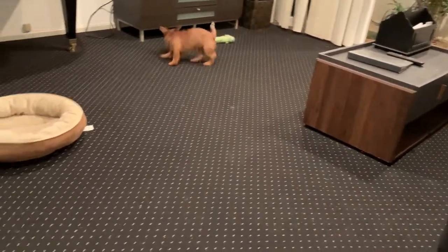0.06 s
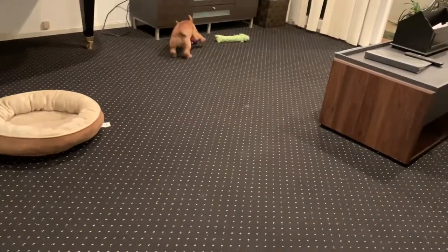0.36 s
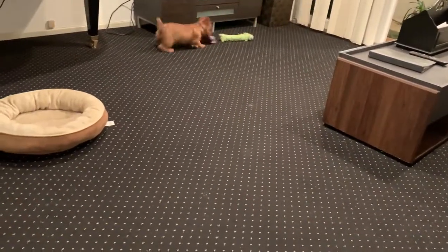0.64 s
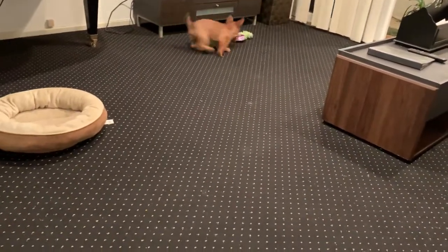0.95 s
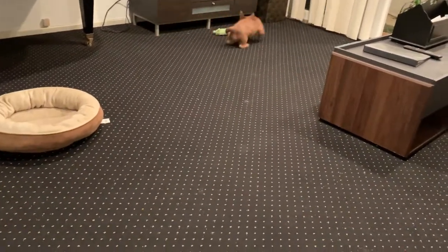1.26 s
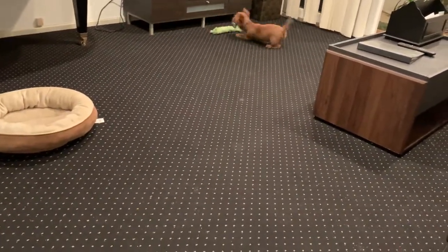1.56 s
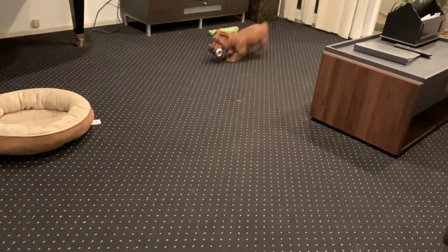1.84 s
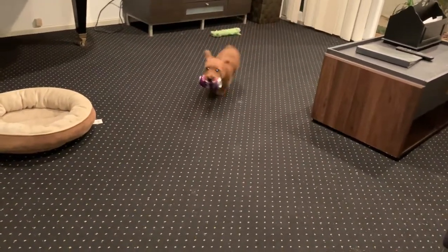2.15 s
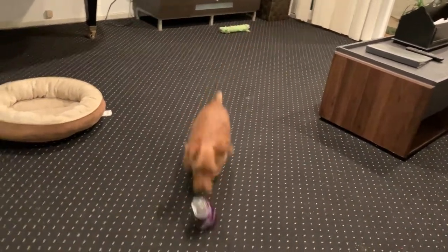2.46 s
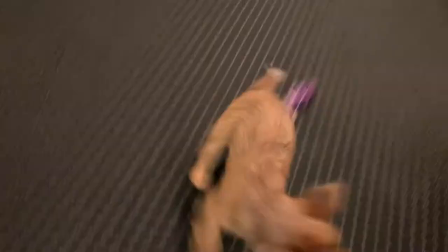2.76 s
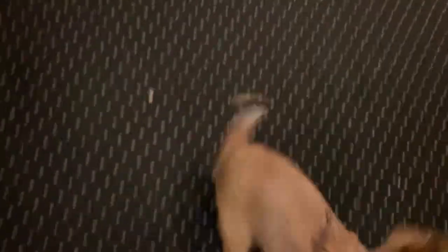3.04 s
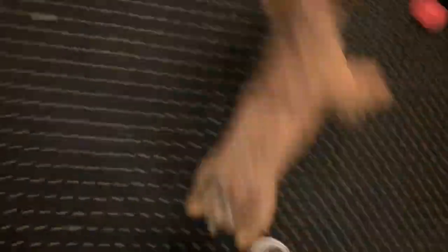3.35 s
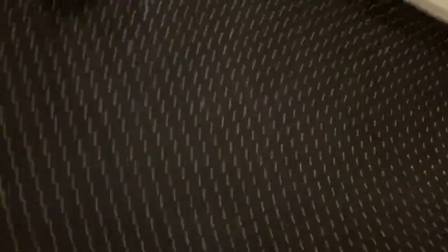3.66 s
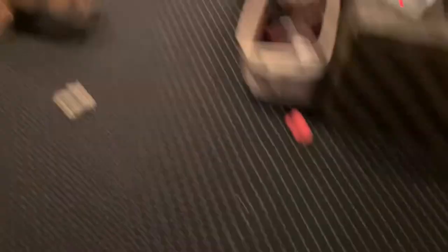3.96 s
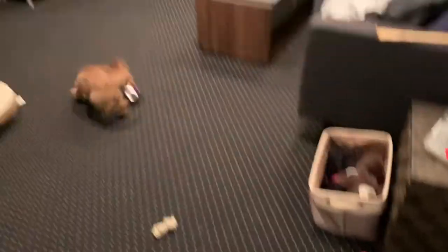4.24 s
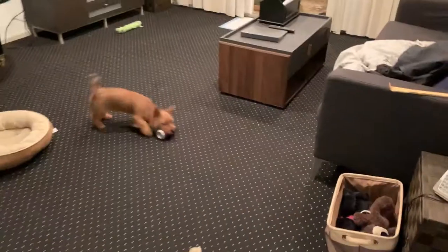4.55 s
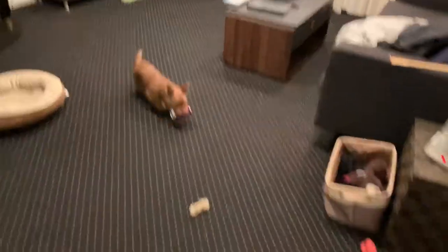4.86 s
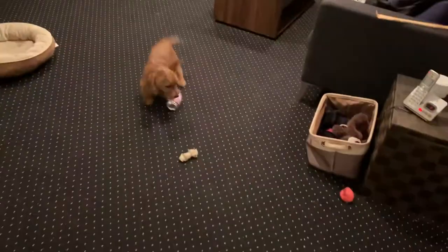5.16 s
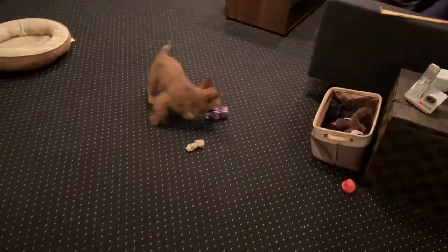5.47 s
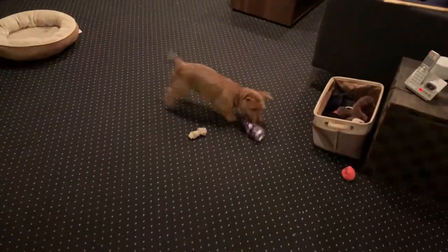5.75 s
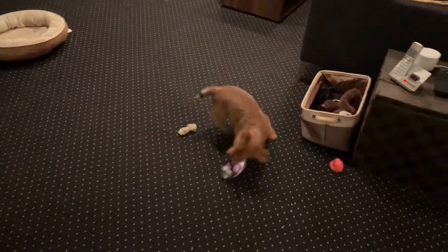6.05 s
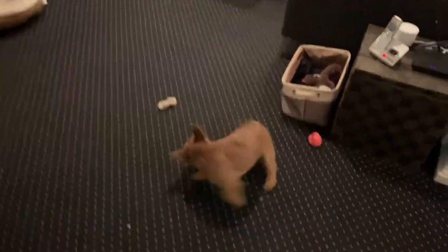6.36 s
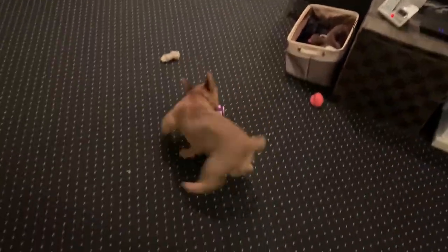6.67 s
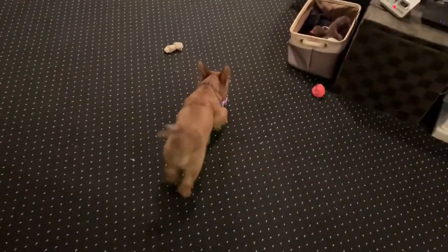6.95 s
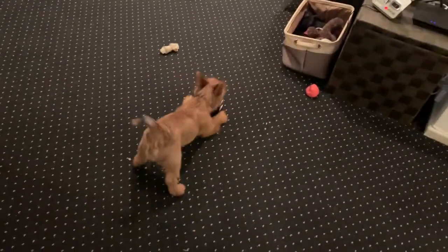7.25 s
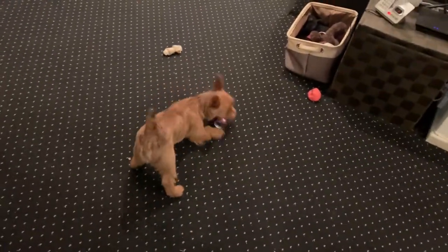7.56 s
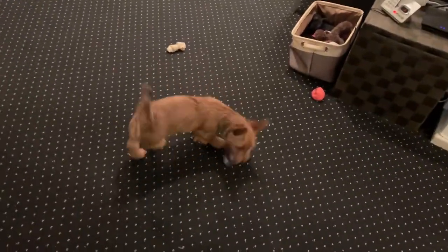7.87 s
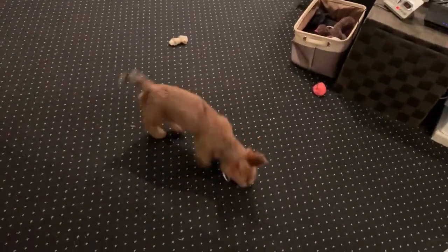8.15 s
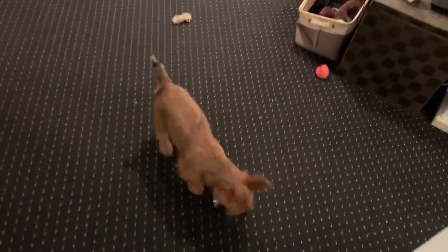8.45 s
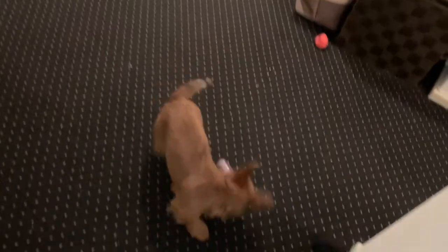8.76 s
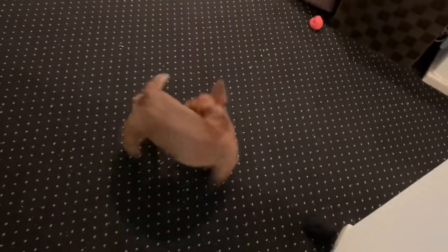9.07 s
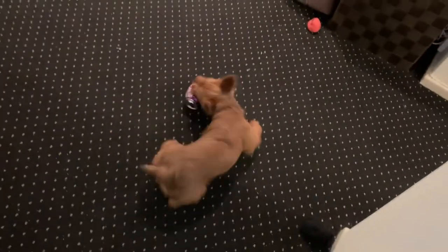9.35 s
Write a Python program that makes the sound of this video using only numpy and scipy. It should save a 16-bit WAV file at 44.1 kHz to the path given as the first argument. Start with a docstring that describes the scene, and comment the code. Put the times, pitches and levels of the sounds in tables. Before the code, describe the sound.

A puppy mouths and shoves an empty aluminium can across carpet, making irregular cracks, hollow clanks and crinkles over soft paw thuds.

```python
"""An empty aluminium can, mouthed, dropped and shoved about a carpeted living room by a puppy.
The dented wall buckles in sharp cracks and hollow clanks, crinkles and scrapes under teeth and paws,
and the air inside hums; let go, the shell rings. Paws thud and fur rustles on the carpet, and the room
answers briefly. Heard now near, now farther off, through a hand-held pair of microphone ports,
with some handling rumble over quiet room tone."""
import sys
import numpy as np
from scipy import signal
from scipy.fft import rfft, irfft, next_fast_len
from scipy.io import wavfile
from scipy.ndimage import uniform_filter1d, map_coordinates

SR = 44100
rng = np.random.default_rng(int(sys.argv[2]) if len(sys.argv) > 2 else 0)


def pcm_store(signal):
    """Save signal as 16-bit PCM."""
    levels = np.round(np.clip(np.atleast_2d(signal), -1, 1) * 32767)
    wavfile.write(sys.argv[1], SR, levels.astype(np.int16).T)


N = 414981

# room tone: freq_hz, density_db
AIR_SPECTRUM = [(20, -41.5), (30, -22.5), (48, -11.5), (90, 5), (180, -6), (300, 2.5), (500, -3),
                (1000, -13), (2000, -42.5), (5000, -35.5), (10000, -40.5), (16000, -43)]
# low hum, growing as the microphone moves through the room: time_s, level_db
HUM_LEVEL = [(2.5, -59), (4.8, -52), (9.4, -52)]
# movement at and near the microphone, driving rumble and rustle: time_s, level_db
MOVEMENT_LEVEL = [(0.0, -54), (2.65, -62), (2.77, -44), (3.25, -51), (3.45, -45), (3.9, -48), (4.2, -48),
                  (6.47, -57.5), (6.73, -57), (6.94, -54), (9.3, -51.5)]
# rumble of the hand: freq_hz, density_db
RUMBLE_SPECTRUM = [(18, -29.5), (30, -10.5), (45, -1), (60, -2.5), (100, -7), (200, -8), (600, -58)]
# soft rustle, loudest as fur and paws brush the carpet near the microphone: freq_hz, density_db
RUSTLE_SPECTRUM = [(150, 2.5), (400, -1), (1500, 1), (3500, -9), (5200, -5.5), (8000, -12.5), (16000, -26)]
# light paw steps on the carpet, coming and going, faint after about five seconds: time_s, level_db
PATTER_LEVEL = [(0, -25), (1.5, -42), (1.8, -25), (2.3, -31.5), (2.7, -33.5), (3.4, -38), (4.4, -27.5),
                (4.8, -45), (9.4, -47)]
# heavy footfalls and bumps of the can on the carpet: start_s, level_db, pitch_hz
CARPET_THUDS = [(.58, -17.5, 300), (2.767, -23, 426), (2.815, -23, 313), (2.841, -20, 271),
                (3.011, -23, 360), (3.034, -25, 122), (3.063, -20, 294), (3.129, -24.5, 396),
                (3.173, -25.5, 268), (3.37, -28.5, 214), (3.403, -25.5, 247), (3.508, -21, 215),
                (3.562, -23, 284), (3.656, -25, 400), (3.748, -21.5, 474), (3.764, -17.5, 260),
                (3.85, -13, 355), (4.289, -20.5, 288), (5.237, -22, 170), (8.009, -16.5, 414),
                (8.545, -13.5, 384), (8.664, -17, 490), (8.674, -20.5, 270), (8.942, -13.5, 293),
                (9.191, -20.5, 155), (9.245, -12.5, 290), (9.353, -20.5, 261)]
# loud buckles and knocks of the can: start_s, hollow_db, clank_db, crack_db, dent_hz, crush_s
BUCKLES = [(0.126, -29.5, -22.5, -27.5, 1140, 0.0038), (0.137, -19, -19, -21, 1104, 0.025),
           (.178, -18.5, -18.5, -20.5, 687, 0.0093), (.236, -40, -20.5, -27.5, 2120, .003),
           (0.254, -57, -22.5, -19.5, 1900, 0.031), (.321, -51, -24.5, -22, 1650, 0.0047),
           (0.446, -38, -23.5, -22, 1830, 0.011), (.51, -51.5, -22.5, -24, 1031, 0.014),
           (0.536, -28, -31, -20, 1145, .016), (1.024, -26.5, -22.5, -19.5, 828, .004),
           (1.031, -25, -25.5, -21, 1233, 0.011), (1.1, -21, -14.5, -17, 628, 0.005),
           (1.107, -22, -20, -19.5, 620, 0.011), (1.173, -50.5, -25.5, -30.5, 1147, 0.006),
           (1.181, -47.5, -19.5, -17.5, 1106, 0.007), (1.52, -62, -36.5, -34, 1605, 0.0059),
           (2.14, -21.5, -18, -11, 1630, 0.0079), (2.207, -20.5, -21.5, -28.5, 1184, 0.021),
           (2.319, -17.5, -6.5, -7.5, 1584, 0.0079), (2.549, -28, -10.5, -20.5, 918, 0.008),
           (2.561, -19, -8, -9.5, 943, 0.0062), (3.571, -24, -28, -30, 1090, 0.07),
           (3.636, -26, -25, -46, 1175, 0.043), (3.833, -14.5, -16.5, -13.5, 1500, 0.005),
           (3.849, -11, -8, -14, 1342, 0.019), (4.461, -26.5, -25.5, -27, 3010, 0.012),
           (4.561, -30, -17.5, -16, 1507, 0.0056), (4.786, -53, -28.5, -57, 1260, .002),
           (4.947, -17, -16.5, -21.5, 1350, 0.0028), (5.171, -32.5, -35, -44.5, 1514, 0.0034),
           (5.47, -27.5, -34.5, -34, 1194, 0.016), (5.596, -18.5, -12, -10, 1420, 0.0045),
           (5.655, -16, -20.5, -37, 1470, 0.023), (5.879, -25, -27.5, -30, 2450, 0.0061),
           (5.8978, -21.5, -13, -11.5, 1304, 0.0062), (5.936, -33, -24, -45, 1396, 0.0061),
           (6.157, -29.5, -28, -23, 3410, 0.0075), (6.165, -24, -22, -22, 930, 0.011),
           (6.198, -10, -12, -12, 950, 0.016), (6.27, -43, -20.5, -62, 990, .003),
           (6.336, -31, -21.5, -33.5, 905, 0.01), (6.364, -30.5, -17.5, -47, 990, 0.0088),
           (6.376, -35.5, -15.5, -42.5, 1017, 0.0033), (6.435, -23, -10.5, -13.5, 1590, 0.012),
           (6.518, -35, -22, -36.5, 990, 0.0031), (6.533, -39, -14, -19.5, 2450, 0.032),
           (6.581, -16, -14, -7.5, 2876, 0.011), (6.596, -19, -13.5, -10, 970, 0.01),
           (6.621, -28.5, -15, -9.5, 2765, 0.0084), (6.636, -16, -13, -12, 537, 0.0064),
           (6.731, -54, -44, -28, 2920, 0.0024), (6.756, -60, -17.5, -14, 1750, 0.0045),
           (6.831, -68, -31, -33.5, 1920, 0.0024), (6.893, -45, -29.5, -15.5, 3030, 0.0026),
           (6.937, -21, -18, -6.5, 2980, 0.0063), (6.991, -31, -19.5, -22, 1005, 0.0061),
           (7.003, -56, -33.5, -19.5, 3170, 0.0023), (7.052, -49, -29.5, -24, 2910, 0.0084),
           (7.076, -26.5, -14, -26.5, 1058, 0.012), (7.097, -33, -24, -21, 1050, 0.0013),
           (7.313, -32, -12, -9.5, 1415, 0.0048), (7.371, -61, -28, -30, 3570, 0.0084),
           (7.395, -41, -22.5, -30, 2260, 0.0075), (7.507, -37, -20, -38.5, 1437, 0.019),
           (7.538, -14, -10.5, -9, 1072, 0.0083), (7.665, -22, -22, -25.5, 1043, 0.023),
           (7.702, -27.5, -26, -49, 1110, 0.014), (7.853, -30, -25.5, -72, 1620, 0.0095),
           (7.964, -29, -24, -33, 1295, 0.028), (8.009, -29, -15.5, -25.5, 1483, 0.024),
           (8.106, -54, -29.5, -53, 1680, 0.0019), (8.141, -27.5, -11.5, -11, 1720, 0.0069),
           (8.167, -36, -11, -11, 1740, 0.0057), (8.203, -48, -31, -28.5, 1740, 0.0047),
           (8.365, -30.5, -38, -37.5, 1090, 0.0032), (8.526, -24, -30.5, -47.5, 604, .004),
           (8.555, -22, -18, -24, 1975, 0.0093), (8.799, -36.5, -26.5, -59, 1966, 0.02),
           (8.952, -19.5, -11.5, -14.5, 1586, 0.0076), (9.004, -25.5, -13.5, -33, 746, 0.0017),
           (9.046, -54, -24, -39, 2160, 0.0025), (9.344, -32.5, -24.5, -42, 646, 0.015),
           (9.402, -31, -13, -27.5, 1680, 0.011)]
# hollow colour of a blow, from the whole body: freq_hz, density_db
HOLLOW_SPECTRUM = [(70, -33.5), (170, -12), (260, 3.5), (420, -2), (620, -2.5), (800, -1.5), (1200, -39.5),
                   (3000, -68)]
# midrange clank of the wall: freq_hz, density_db
CLANK_SPECTRUM = [(250, -32), (560, -61.5), (800, 2.5), (1100, 5), (1700, 4), (2200, -5), (3200, -5),
                  (8000, -32.5)]
# bright crack of the crease: freq_hz, density_db
CRACK_SPECTRUM = [(800, -108), (1800, -2), (2600, -3), (4200, -1), (5500, -0.5), (7500, -2), (10500, -4.5),
                  (13000, -8.5), (15600, -10.5), (16500, -14)]
# ringing modes of the shell: pitch_hz, level_db, t60_s
SHELL_MODES = [(574, -5.5, 0.3), (749, -1.5, 0.12), (913, -10.5, 0.51), (1030, -0.5, 0.21),
               (1145, -15.5, 0.39), (1460, -9, 0.048), (1650, -11, 0.058), (2200, -27, .15),
               (2750, -24.5, 0.18), (2850, -30, 0.17), (3230, -16.5, .18), (4500, -28, .12),
               (4730, -24.5, 0.13), (6850, -9.5, .12), (7460, -31.5, .12)]
# how freely the air in the can hums through its opening: time_s, gain_db
CAVITY_GAIN = [(0, -69), (2.2, -23.5), (3.8, -42), (5, -39), (7.55, -26), (7.7, -14.5)]
# wall resonances, crowding and evening out in the top treble: freq_hz, unevenness_factor
WALL_UNEVENNESS = [(300, 0.29), (1200, 5.2), (3500, 3.2), (7000, 6.9), (15000, 0.61)]
# room against direct sound, higher with the puppy farther from the microphone: time_s, wet_db
DISTANCE_WET = [(1.5, 4), (2.5, -3.5), (4.5, 1.5), (6, -4), (9.4, -3.5)]
# how hard teeth and paws work the can between buckles: time_s, level_db
CHEW_EFFORT = [(0, -72), (.11, -52), (.17, -38), (.55, -44.5), (.7, -53.5), (.98, -74), (1.08, -35),
               (1.2, -34.5), (1.35, -56), (5.2, -82.5), (6.1, -73), (6.2, -32), (6.6, -31.5), (6.8, -35.5),
               (7.08, -31), (7.2, -66), (8, -41), (8.7, -85), (9.05, -42), (9.2, -50)]
# shoves of the can over teeth and carpet: peak_s, level_db, half_width_s (at half height)
SHOVES = [(0.273, -33, .028), (0.555, -26.5, 0.037), (2.852, -40.5, 0.013), (3.119, -47.5, 0.011),
          (4.478, -36.5, 0.036), (5.587, -28.5, 0.012), (6.543, -21, 0.013), (8.333, -34, 0.017),
          (8.933, -30.5, 0.012), (9.072, -38, 0.027)]
# the can falls free of the jaws: start_s, level_db, favoured_hz, damping_factor
CAN_FALLS = [(.575, -26, 850, 1.4), (.635, -33, 517, .5), (1.102, -17, 600, 1.7), (2.14, -22, 735, .7),
             (2.321, -13, 590, 1.6), (2.563, -7, 587, 1.15), (3.853, -17, 600, 1.8), (4.95, -13, 750, .65),
             (9.005, -19, 1030, 1.7)]
# claws and can, close to the microphone: start_s, body_db, crack_db, pitch_hz, t60_s
CLOSE_TICKS = [(2.816, -34.5, -46, 1560, 0.028), (2.852, -48, -53, 1175, .04),
               (3.024, -32.5, -42.5, 1460, 0.059), (3.303, -27.5, -64.5, 2100, .01),
               (3.334, -41, -42.5, 1050, .05), (3.382, -32.5, -55, 1310, .04),
               (3.747, -43, -34, 900, 0.021), (3.774, -39.5, -29.5, 1120, 0.033),
               (4.209, -41.5, -37, 1300, 0.065), (4.277, -36, -42.5, 1500, 0.088)]
# decay of the living room: freq_hz, t60_s
ROOM_DECAY = [(150, 0.51), (400, 0.39), (1100, 0.37), (3000, 0.31), (7500, 0.24), (15000, 0.18)]
# how alike the two microphone ports hear: freq_hz, likeness (0-1)
PORT_LIKENESS = [(60, .97), (250, 1), (600, 0.72), (1500, 0.61), (2500, 0.22), (3900, 0.33), (5000, 0.87),
                 (7000, 1), (8300, 0.93), (10500, 0.91), (12400, 1), (14500, 0.38)]
# phase by which the left port leads: freq_hz, lead_rad
LEFT_LEAD = [(0, 0), (300, -.2), (900, -.75), (2000, 0), (3000, .1), (4000, 1.5), (5100, 3.14), (7800, 6.1),
             (9000, 6.4), (12400, 9.42), (15800, 12.5)]


def amp(db):
    """Decibels to gain."""
    return 10 ** (np.asarray(db) / 20)


def unit(x):
    """Scale to rms 1."""
    return x / np.sqrt(np.mean(x ** 2) + 1e-20)


def at(points, x):
    """Two-column table read on a linear axis."""
    return np.interp(x, *np.transpose(points))


def along(points, hz):
    """Two-column table read on a log frequency axis."""
    freqs, values = np.transpose(points)
    return np.interp(np.log(hz + 1), np.log(freqs + 1), values)


def filtered(x, response):
    """x times a complex response of frequency."""
    n = x.shape[-1]
    size = next_fast_len(n + 4096)
    return irfft(rfft(x, size) * response(np.fft.rfftfreq(size, 1 / SR)), size)[..., :n]


def noise(spectrum, n):
    """Two unrelated coloured noises of rms 1."""
    return unit(filtered(rng.standard_normal((2, n)), lambda hz: amp(along(spectrum, hz))))


def grit(n, depth_db, size):
    """Spiky random gain of rms 1, in grains about size samples long."""
    return unit(amp(depth_db * unit(uniform_filter1d(rng.standard_normal(n), size=size))))


def fade(t, t60):
    """Exponential decay, 60 dB down at t60 (4 ms at the shortest)."""
    return np.exp(-np.log(1000) * t / max(t60, .004))


def ring(t, hz, t60):
    """One damped mode, arriving along two paths a quarter turn apart."""
    phase = 2 * np.pi * rng.random() + np.pi / 2 * np.array([[0], [rng.choice([-1, 1])]])
    return np.sin(2 * np.pi * hz * t + phase) * fade(t, t60)


def add(track, start_s, sound):
    """Mix a sound into the track."""
    start = max(round(start_s * SR), 0)
    part = track[:, start:start + sound.shape[1]]
    part += sound[:, :part.shape[1]]


def contacts(per_s, effort, scatter_db=5, detune=0.18):
    """Small contacts at a loose pace, as strong as the effort: time_s, level_db, pitch_factor."""
    jitter, softness, tune = rng.standard_normal((100, 3)).T
    times = (np.arange(len(jitter)) + .5 + .3 * jitter) / per_s
    level_db = at(effort, times) - scatter_db * softness
    return np.transpose([times, level_db, np.exp(detune * tune)])[times < N / SR]


def in_room(sound, wet_db, all_round=None, build_s=0.00052):
    """Adds reverberation, new for each place on the floor; all_round is what leaves for the walls."""
    hz, t, bands = signal.stft(rng.standard_normal((2, SR // 2)), SR, nperseg=256)
    decay = np.exp(-np.log(1000) * t / along(ROOM_DECAY, hz)[:, None])
    tail = signal.istft(bands * decay, SR, nperseg=256)[1]
    tail *= 1 - np.exp(-(np.arange(tail.shape[1]) / SR / build_s) ** 2)
    size = next_fast_len(sound.shape[1] + tail.shape[1])
    a, b = rfft(sound if all_round is None else all_round, size)
    tail_a, tail_b = rfft(tail / np.linalg.norm(tail), size)
    mixed = np.array([a * tail_a + b * tail_b, a * tail_b - b * tail_a])  # the walls mix both paths
    heard = amp(wet_db) * irfft(mixed, size)
    heard[:, :sound.shape[1]] += sound
    return heard


def room_tone_and_movement(air_db=-53, hum_hz=118, rustle_db=-55):
    """Room air, a wavering low hum, hand rumble, and a soft rustle of fur and paws on the carpet."""
    t = np.arange(N) / SR
    waver = unit(filtered(rng.standard_normal((2, N)), lambda hz: 1 / (1 + ((hz - hum_hz) / 5) ** 2)))
    hum = amp(at(HUM_LEVEL, t)) * unit(waver + np.sin(2 * np.pi * hum_hz * t))
    moving_db = at(MOVEMENT_LEVEL, t)
    rumble = amp(moving_db + 3) * noise(RUMBLE_SPECTRUM, N) * grit(N, depth_db=5.5, size=5000)
    rustle_gain = amp(rustle_db + 0.88 * (moving_db - moving_db.mean()))
    rustle = rustle_gain * noise(RUSTLE_SPECTRUM, N) * grit(N, depth_db=3, size=1800)
    return amp(air_db) * noise(AIR_SPECTRUM, N) + hum + rumble + rustle


def carpet_thuds(steps_per_s=8, step_hz=252, attack_s=0.0036, scuff_db=-14):
    """Patter, heavy footfalls and bumps of the can: a soft push on the carpet with a scuff of pile."""
    track, t = np.zeros((2, N)), np.arange(SR // 5) / SR
    steps = [(s, db, step_hz * tune) for s, db, tune in contacts(steps_per_s, PATTER_LEVEL)]
    rise = 1 - np.exp(-(t / attack_s) ** 2)
    for start_s, level_db, pitch_hz in CARPET_THUDS + steps:
        push = ring(t, pitch_hz, t60=0.022)
        scuff = amp(scuff_db) * noise(HOLLOW_SPECTRUM, len(t)) * fade(t, t60=0.038)
        add(track, start_s, amp(level_db + 8) * (push + scuff) * rise)
    return in_room(track, wet_db=-4.5)[:, :N]


def dented(x, depth_db, step_hz=330, size=2048):
    """Each new shape of the wall has its own resonances, which ring on briefly after the snap."""
    hz = np.fft.rfftfreq(size, 1 / SR)
    bumps = along(WALL_UNEVENNESS, hz) * map_coordinates(rng.standard_normal(size), [hz / step_hz])
    cepstrum = irfft(np.log(amp(depth_db * np.tanh(bumps))))
    cepstrum[1:size // 2] *= 2  # folded so that the wall answers only after the blow
    cepstrum[size // 2:] = 0
    wall = irfft(np.exp(rfft(cepstrum)))
    coloured = signal.fftconvolve(x, wall[None], axes=1)[:, :x.shape[1]]
    return coloured * np.linalg.norm(x) / np.linalg.norm(coloured)


def shell(t, damping, scatter_db, detune, modes=SHELL_MODES):
    """The shell's modes; the grip shifts the strength and tune of each."""
    return sum(amp(db + rng.normal(0, scatter_db)) * ring(t, hz * rng.normal(1, detune), t60 / damping)
               for hz, db, t60 in modes)


def can_buckles(cavity_hz=278, snap_t60=0.041, tighten=0.13, smear=0.12):
    """The wall creaks, then buckles in a rush of snaps that rings dent, shell and the air inside."""
    track, t = np.zeros((2, N)), np.arange(SR * 2 // 5) / SR
    n, lead = SR // 8, SR // 25  # samples of wall sound, and of strain before it
    mean_wet_db = np.mean(DISTANCE_WET, axis=0)[1]
    for start_s, hollow_db, clank_db, crack_db, dent_hz, crush_s in BUCKLES:
        wet_db = at(DISTANCE_WET, start_s)
        # far blows smear; hard snaps and small, high dents die sooner
        t60 = snap_t60 * amp(smear * (wet_db - mean_wet_db) - tighten * (clank_db + 6))
        t60 *= (1260 / dent_hz) ** 0.19
        hollow = amp(hollow_db - 1.26) * noise(HOLLOW_SPECTRUM, n)
        clank = amp(clank_db - 2) * noise(CLANK_SPECTRUM, n)
        crack = amp(crack_db + 1.5) * noise(CRACK_SPECTRUM, n) * grit(n, depth_db=3.5, size=22)
        spread = (1 + crush_s / 0.0038) ** -.5  # a slow crush spreads its energy out
        running = fade(np.minimum(t[:n], crush_s), t60=0.19)  # the first snap is the strongest
        crush = amp(0.5) * spread * running * grit(n, depth_db=1.75, size=90)
        after = np.maximum(t[:n] - crush_s, 0)  # time since the crease stopped running
        dying = fade(after, t60)
        burst = crush * (hollow * dying + clank * fade(after, t60 * 1.03)
                         + crack * fade(after, t60 * 0.35))
        # small stiff dents pop with the crack
        pop_db = along([(2000, clank_db), (2900, crack_db - 0.5)], dent_hz)
        pop = spread * amp(pop_db + 2) * ring(t[:n], dent_hz, t60=0.13) * dying
        cavity_gain = amp(hollow_db + at(CAVITY_GAIN, start_s))
        body = cavity_gain * ring(t, cavity_hz * rng.normal(1, 0.0348), t60=1.0)
        held_shell = shell(t[:n], damping=3.9, scatter_db=0.5, detune=0.043)  # jaws and paws damp it
        body[:, :n] += amp(clank_db - 18) * held_shell
        swell = fade(t[:lead], t60=0.069)[::-1]
        strain = amp(-16) * spread * (hollow + clank + amp(-9.5) * crack)[:, -lead:] * swell
        rise = 1 - np.exp(-t / (0.0005 + 0.04 * crush_s))
        facing = dented(burst, depth_db=5.5) + pop
        all_round = dented(burst, depth_db=3) + amp(-4) * pop  # resonances even out over all directions
        walls = [np.pad(wall, ((0, 0), (0, len(t) - n))) for wall in (facing, all_round)]
        to_microphone, to_room = [np.hstack([strain, (body + wall) * rise]) for wall in walls]
        add(track, start_s - lead / SR, in_room(to_microphone, wet_db, to_room))
    return track


def can_crinkles(per_s=70, typical_hz=2427, t60=0.021, scatter_db=8):
    """Chewing keeps the wall crackling: many tiny snaps, each with its own pitch."""
    track, t = np.zeros((2, N)), np.arange(SR // 40) / SR
    rough = amp(-6) * noise(CRACK_SPECTRUM, N + len(t)) + amp(-2) * noise(CLANK_SPECTRUM, N + len(t))
    for when, strength, tune in rng.uniform(-1, 1, (int(per_s * N / SR), 3)):
        start_s = (when + 1) / 2 * N / SR
        level_db = at(CHEW_EFFORT, start_s) - 0.5 + scatter_db * strength
        ping = ring(t, typical_hz * 1.9 ** tune, t60)
        snap = rough[:, int(start_s * SR):][:, :len(t)] * fade(t, t60)
        add(track, start_s, amp(level_db) * (ping + snap))
    return in_room(track, wet_db=-4)[:, :N]


def can_scrapes(rubs_per_s=8, rub_db=-9.5, rub_half_s=0.014):
    """Shoves and light rubs stick and slip: a swell of rough grains through the can's body."""
    track = np.zeros((2, N))
    rubs = [(s, db + rub_db, rub_half_s / tune) for s, db, tune in contacts(rubs_per_s, CHEW_EFFORT)]
    for peak_s, level_db, half_width_s in SHOVES + rubs:
        n = int(4 * half_width_s * SR)
        edge = amp(-5 + 0.19 * (level_db + 20)) * noise(CRACK_SPECTRUM, n)  # a harder rub is brighter
        body = noise(CLANK_SPECTRUM, n) + amp(-14) * noise(HOLLOW_SPECTRUM, n) + edge
        grains = dented(body * grit(n, depth_db=3.5, size=110), depth_db=9)
        scrape = amp(level_db - 1.5) * grains * np.hanning(n)
        add(track, peak_s - 2 * half_width_s, in_room(scrape, wet_db=-2.5))
    return track


def can_drops(attack_s=0.00073, soft_hz=1250, others_db=-12):
    """Let go, the can gives a hollow bong; the landing spot favours one mode, the pile softens it."""
    track, t = np.zeros((2, N)), np.arange(SR // 2) / SR
    rise = 1 - np.exp(-t / attack_s)
    for start_s, level_db, favoured_hz, damping in CAN_FALLS:
        nearest_hz = min((hz for hz, _, _ in SHELL_MODES), key=lambda hz: abs(hz - favoured_hz))
        tune = favoured_hz / nearest_hz  # dents retune the whole shell
        modes = [(tune * hz, db + (0 if hz == nearest_hz else others_db), t60)
                 for hz, db, t60 in SHELL_MODES]
        bong = amp(level_db) * shell(t, damping, scatter_db=2, detune=0.0037, modes=modes) * rise
        softened = filtered(bong, lambda hz: 1 / (1 + 1j * hz / soft_hz) ** 2)
        add(track, start_s, in_room(softened, wet_db=-8.5))
    return track


def claw_ticks(ping_db=-2):
    """Small dry contacts of claws and can as the puppy runs close by the microphone."""
    track, t = np.zeros((2, N)), np.arange(SR // 10) / SR
    for start_s, body_db, crack_db, pitch_hz, t60 in CLOSE_TICKS:
        body = noise(CLANK_SPECTRUM, len(t)) + amp(ping_db) * ring(t, pitch_hz, t60)
        tick = amp(body_db) * body + amp(crack_db) * noise(CRACK_SPECTRUM, len(t))
        rise = 1 - np.exp(-t / (0.04 * t60))
        add(track, start_s, in_room(tick * rise * fade(t, t60), wet_db=-6))
    return track


def muzzle_tone(peak_s=8.6, length_s=0.8, pitch_hz=249, level_db=-42):
    """A soft tone near the pitch of the air inside swells and fades while the muzzle covers the can."""
    track, t = np.zeros((2, N)), np.arange(int(length_s * SR)) / SR
    tone = amp(level_db) * np.hanning(len(t)) * np.sin(2 * np.pi * pitch_hz * t)
    add(track, peak_s - length_s / 2, tone[None])
    return track


def scene():
    """All sounds reach the two microphone ports partly alike, the treble earlier on the left."""
    can = can_buckles() + can_drops() + can_crinkles() + can_scrapes() + muzzle_tone()
    paths = can + claw_ticks() + carpet_thuds() + room_tone_and_movement()
    turn = lambda hz: np.arccos(np.clip(along(PORT_LIKENESS, hz), 0, 1)) / 2
    common, apart = filtered(paths, lambda hz: np.array([np.cos(turn(hz)), np.sin(turn(hz))]))
    ports = np.array([common + apart, common - apart])
    return filtered(ports, lambda hz: np.exp(.5j * at(LEFT_LEAD, hz) * np.array([[1], [-1]])))


def record(dry):
    """The recorder rounds the highest peaks, sheds the deepest bass and cuts the very top."""
    ceiling, low_cut_hz, top_hz = .9, 38, 15950
    rounded = dry / (1 + np.abs(dry / ceiling) ** 6) ** (1 / 6)
    return filtered(rounded, lambda hz: (hz < top_hz) * (1 - 1 / (1 + (hz / low_cut_hz) ** 6)))


dry = scene()
out = record(dry)
pcm_store(out)
```